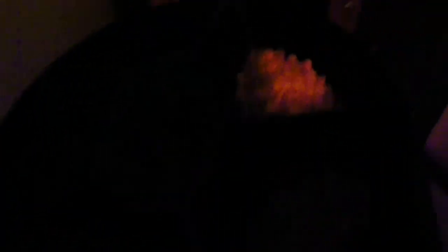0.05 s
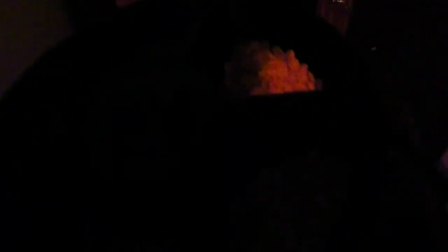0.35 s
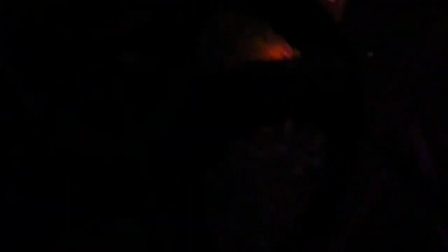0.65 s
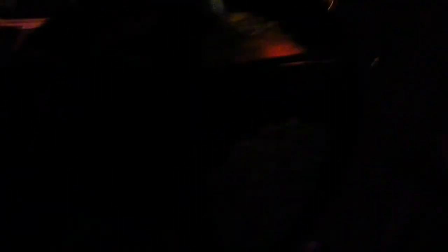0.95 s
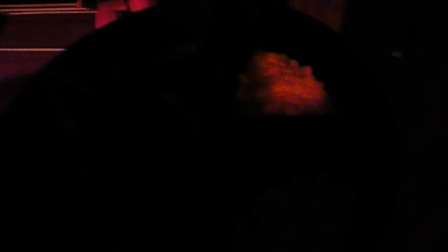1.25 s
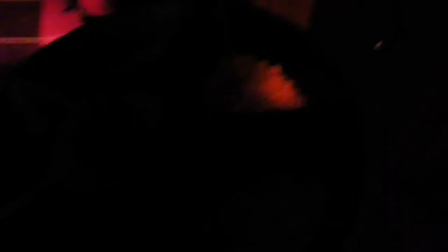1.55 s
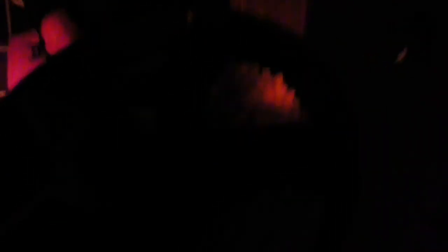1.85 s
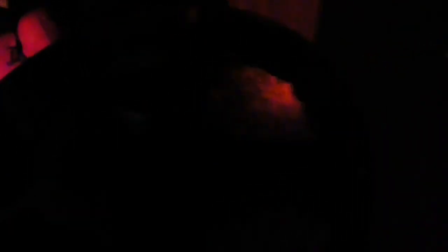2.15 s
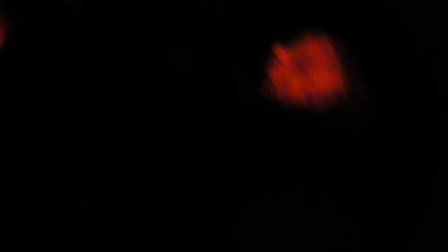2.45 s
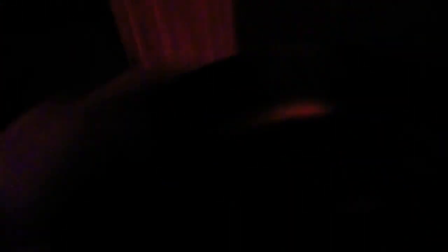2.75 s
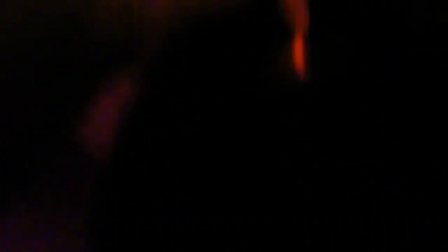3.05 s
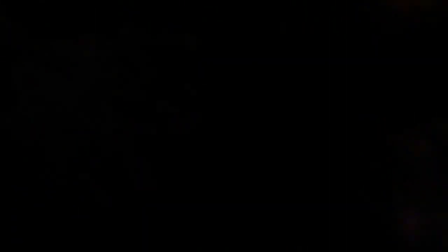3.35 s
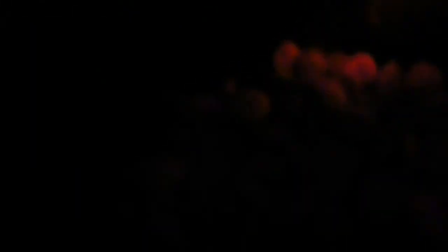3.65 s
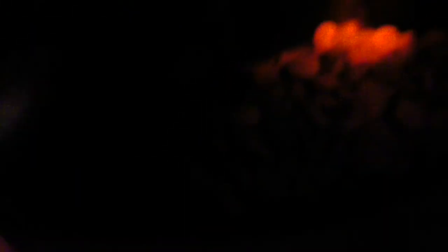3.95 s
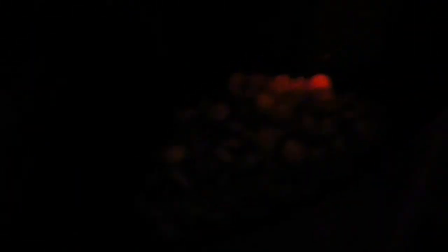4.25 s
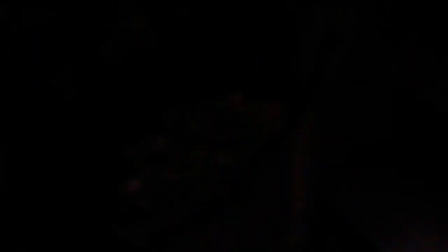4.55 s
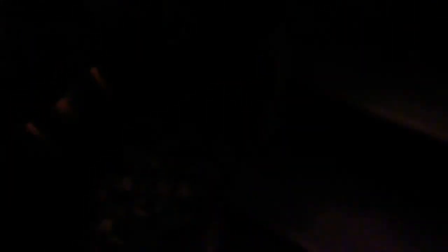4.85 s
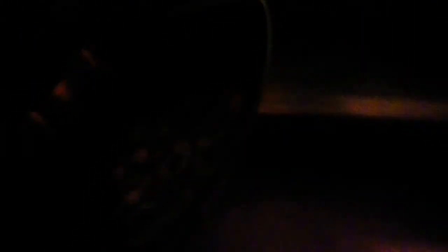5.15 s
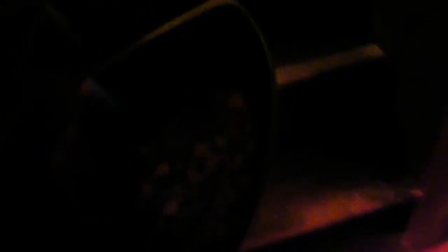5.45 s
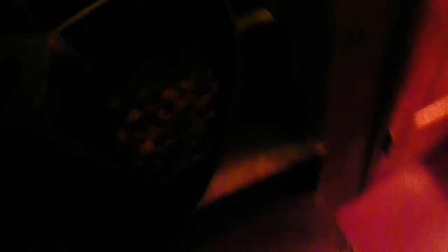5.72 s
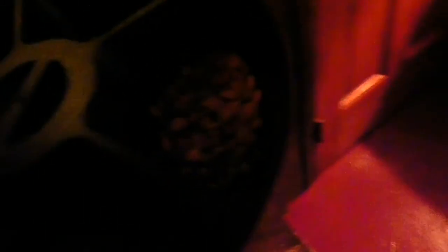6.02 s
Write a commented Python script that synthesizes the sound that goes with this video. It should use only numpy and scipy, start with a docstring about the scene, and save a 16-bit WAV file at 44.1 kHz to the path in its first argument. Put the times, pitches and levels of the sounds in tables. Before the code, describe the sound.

Irregular plastic clatter and sliding kibble over soft footsteps indoors, followed by a thud, a snapping catch and light rubbing.

```python
"""A hard plastic feeder tray of dry pet food is carried close to a small mono microphone, indoors.
At each step the floor booms softly, the lid knocks and kibble slides, drumming on the bowls.
The tray bumps something heavy and flexes; a catch squeaks along its seat, clacks and snaps shut.
Hands and sleeves rub the plastic in fine stick-slip grains, and a few single pellets tick.
A small hard room answers, and the loudest blows duck the gain."""
import sys
import numpy as np
from scipy import signal
from scipy.fft import rfft, irfft, next_fast_len
from scipy.io import wavfile
from scipy.ndimage import uniform_filter1d

SR = 44100
rng = np.random.default_rng(int(sys.argv[2]) if len(sys.argv) > 2 else 0)


def bounce(signal):
    """Save signal as a 16-bit WAV file at the path given by the first command-line argument."""
    frames = np.transpose(np.atleast_2d(signal))
    limited = np.clip(frames, -1, 1)
    pcm = np.round(limited * 32767).astype(np.int16)
    wavfile.write(sys.argv[1], SR, pcm)


N = 268250

# resonances of the tray: f/Hz, width/Hz, level/dB
TRAY_MODES = [(340, 19, 7), (480, 290, 1.5), (647, 300, -2), (866, 130, -2), (1304, 290, -4.5),
              (1634, 120, -8), (2330, 47, -6), (4100, 230, -7), (5380, 180, -10), (6340, 160, -8)]
# broad colour of struck plastic: f/Hz, level/dB
PLASTIC_COLOUR = [(30, -45), (60, -32), (100, -14), (200, -11), (300, -9), (600, -3.5), (1500, 0.5),
                  (3000, -0.5), (7000, 4), (10000, -3), (15000, -14)]
# strokes on the rim, mostly of sleeves (the one at 3.395 s is a hand): peak t/s, length/s, body level/dB,
# treble level/dB, fizz level/dB
SLEEVE_STROKES = [(2.5, .14, -63, -54, -47), (3.395, 0.033, -48, -36, -33), (4.127, 0.033, -81, -53, -49),
                  (4.219, 0.044, -52.5, -48.5, -62), (4.347, 0.057, -50.5, -51, -59),
                  (4.452, .07, -62, -49.5, -47), (4.565, 0.039, -58, -49.5, -51),
                  (4.669, 0.05, -54.5, -42, -35), (4.82, 0.21, -47.5, -52.5, -63),
                  (4.98, 0.032, -40, -36.5, -50), (5.112, 0.067, -46.5, -37.5, -58),
                  (5.198, 0.011, -42.5, -36.5, -36), (5.297, 0.034, -48, -36.5, -37),
                  (5.352, 0.033, -69, -54, -33.5), (5.44, 0.24, -53, -46.5, -62),
                  (5.5, 0.036, -58, -36, -33.5), (5.672, 0.076, -46.5, -39, -44),
                  (5.838, 0.081, -52, -35, -49), (5.96, 0.066, -53, -44.5, -58),
                  (6.07, 0.069, -60, -50, -62)]


def amp(db):
    """Decibels to gain."""
    return 10 ** (np.asarray(db) / 20)


def unit_rms(x):
    """Scales each row to rms 1."""
    return x / np.sqrt(np.mean(x ** 2, -1, keepdims=True) + 1e-20)


def curve(points, hz):
    """Reads a table over log frequency."""
    f, value = np.transpose(points)
    return np.interp(np.log(hz + 1), np.log(f), value)


def add(mix, s, sound):
    """Adds a sound to the mix at time s."""
    part = mix[max(round(s * SR), 0):][:len(sound)]
    part += sound[:len(part)]


def with_send(x, room_db):
    """Two rows: the direct sound and its send to the room."""
    return np.array([x, amp(room_db) * x])


def low_cut(x, hz):
    """Takes the deep bass out of a sound with a gentle high-pass."""
    return signal.sosfilt(signal.butter(2, hz, "highpass", fs=SR, output="sos"), x)


def resonance(modes, hz, bed_db):
    """Gain of a body: its resonances over a bed of dense weak modes."""
    peaks = sum(amp(db) ** 2 / (1 + (2 * (hz - f) / width) ** 2) for f, width, db in modes)
    return np.sqrt(amp(bed_db) ** 2 + peaks)


def contact(hz, treble_db):
    """A soft, long contact reaches only the low modes."""
    cutoff_hz = 1300 + 20000 * amp(1.53 * treble_db)
    return 1 / np.hypot(1, (hz / cutoff_hz) ** 2)


def bands(x, colour, bass_hz=210, treble_hz=2500):
    """Colours x by the gain colour(hz) and splits it into body, bass and treble."""
    size = next_fast_len(len(x), real=True)
    hz = np.fft.rfftfreq(size, 1 / SR)
    bass = 1 / (1 + (hz / bass_hz) ** 8)
    treble = 1 - 1 / (1 + (hz / treble_hz) ** 8)
    shares = np.sqrt(np.clip([1 - bass - treble, bass, treble], 0, 1))
    return irfft(rfft(x, size) * colour(hz) * shares, size)[:, :len(x)]


def grains(count, per_s, spread_db):
    """Tiny impacts of uneven strength at random moments."""
    chance, size, sign = rng.random(count), rng.exponential(1, count), rng.choice([-1, 1], count)
    return unit_rms((chance < per_s / SR) * sign * amp(spread_db * np.minimum(size, 4)))


def blows(hits, spectrum, modes, bed_db, ring_db, ring_share, hard_rise_s, bass_db, bass_t60, level_db):
    """Each blow sets a crowd of modes dying away; the spot that is hit favours one ring."""
    out, t = np.zeros(N), np.arange(8192) / SR
    hard_db, softening = -18, 0.42  # weaker, duller blows are softer contacts and rise more slowly
    for s, db, treble_db, decay, ring_hz in hits:
        def colour(hz):
            spot = 1 + amp(ring_db) / (1 + (2 * (hz - ring_hz) / (ring_share * ring_hz)) ** 2)
            return amp(curve(spectrum, hz)) * resonance(modes, hz, bed_db) * spot * contact(hz, treble_db)
        rise = hard_rise_s * amp(softening * (hard_db - db - max(treble_db, 0)))
        t60s = np.array([[1.66 * decay], [bass_t60], [1.12 * decay]])  # treble dies before the body
        envelope = np.minimum(t / rise, 1) * amp(-60 * np.maximum(t - rise, 0) / t60s)
        envelope_rms = np.sqrt(np.mean(envelope ** 2, 1, keepdims=True))
        noise = bands(rng.standard_normal(len(t)), colour)
        body, bass, treble = unit_rms(noise * envelope) * envelope_rms
        clack = low_cut(body + amp(treble_db) * treble, hz=203)
        add(out, s, amp(level_db + db) * (clack + amp(bass_db) * bass))
    return out


def strokes(peaks, lengths, dbs, lean=0.15, roundness=1.69):
    """Gain of a run of strokes: each swells faster than it fades, 3 dB down at the ends of its length."""
    t = np.arange(0, N, 64) / SR
    since = t - peaks[:, None]
    away = abs(2 * since / lengths[:, None] / (1 + lean * np.sign(since)))
    power = amp(dbs[:, None]) ** 2 * 0.5 ** (away ** roundness)
    return np.interp(np.arange(N) / SR, t, np.sqrt(power.sum(0)))


def rubbing(rows, modes, per_s, spread_db, bass_db):
    """Fine stick-slip grains of skin or cloth on plastic."""
    # broad colour of the friction: f/Hz, level/dB
    spectrum = [(30, -6.5), (100, 9), (200, -4.5), (330, -1), (450, 0.5), (900, 1), (1500, 0.5), (2300, 0),
                (4000, 6), (6300, 10), (9000, 6), (12000, -4), (15500, -9.5)]
    s, length, body_db, treble_db, *_ = np.transpose(rows)
    friction = grains(N, per_s, spread_db)
    coloured = bands(friction, lambda hz: amp(curve(spectrum, hz)) * resonance(modes, hz, bed_db=-2))
    body, bass, treble = unit_rms(coloured)
    rub = (body + amp(bass_db) * bass) * strokes(s, length, body_db)
    return rub + treble * strokes(s, length, treble_db)


def air(level_db):
    """Steady faint hiss of the room and microphone."""
    # colour of the hiss: f/Hz, level/dB
    spectrum = [(18, -34), (30, -15), (225, -19), (341, -4), (399, -11.5), (518, -4.5), (808, -16),
                (5040, -18), (6370, -14.5), (8060, -18), (10200, -19.5), (15500, -25.5)]
    colour = amp(curve(spectrum, np.fft.rfftfreq(N, 1 / SR)))
    return amp(level_db) * unit_rms(irfft(rfft(rng.standard_normal(N)) * colour, N))


def lid_knocks():
    """Lid and kibble knock against the tray and ring its modes."""
    # knocks: t/s, body level/dB, treble over body/dB, base decay/s, ring f/Hz
    hits = [(0.032, -34, -20, 0.011, 860), (0.116, -30, -3, 0.11, 675), (0.271, -55.5, 20, .12, 2460),
            (0.2875, -17, 1.5, 0.037, 990), (0.2925, -15, -0.5, 0.048, 1600), (0.308, -26, 0, 0.12, 900),
            (0.386, -30.5, -1.5, 0.1, 1740), (0.441, -32.5, 3, .09, 2470), (0.48, -36.5, 12, .11, 3130),
            (0.541, -32.5, 10, 0.065, 6940), (0.551, -39, 9, 0.033, 3800), (0.5775, -19.5, 10, 0.045, 3880),
            (0.593, -18, -1.5, 0.062, 1630), (0.627, -27.5, 8.5, 0.11, 5800),
            (0.765, -33.5, 4.5, 0.086, 2220), (0.869, -37.5, -16, 0.13, 1220),
            (0.8905, -27.5, 1, 0.085, 6300), (0.991, -25, 0, 0.066, 2380), (1.077, -30, -5, 0.064, 816),
            (1.171, -33.5, -39, 0.11, 860), (1.203, -33, -3.5, 0.071, 680), (1.278, -33, 0, 0.22, 3760),
            (1.366, -34, 3, 0.28, 1660), (1.416, -31, -13, 0.13, 1540), (1.4425, -16, -5.5, 0.052, 1480),
            (1.456, -25, -1, 0.072, 1320), (1.772, -29, -3.5, 0.072, 715), (1.808, -27.5, -12, 0.21, 680),
            (1.859, -34, 5.5, 0.22, 1470), (2.156, -35.5, -1, 0.17, 567), (2.192, -31.5, -2.5, 0.23, 1020),
            (2.216, -24.5, -7, 0.049, 1290), (2.586, -33, -6.5, 0.075, 1280), (2.966, -42, 11, 0.21, 2820),
            (3.005, -32.5, -7.5, .1, 650), (3.26, -25.5, -8.5, 0.06, 1296), (4.409, -41, 2.5, 0.047, 6100),
            (4.536, -45, -19, 0.065, 1020), (5.257, -39, -22, 0.019, 1190)]
    return blows(hits, PLASTIC_COLOUR, TRAY_MODES, bed_db=-8, ring_db=7.5, ring_share=0.085,
                 hard_rise_s=0.0021, bass_db=-35, bass_t60=0.22, level_db=-1.5)


def hands(level_db):
    """Skin rubs the tray as the hands shift their grip."""
    # strokes: peak t/s, length/s, body level/dB, treble level/dB
    grips = [(0.05, 0.13, -47, -34), (0.23, 0.66, -36.5, -51), (0.7, .1, -60, -41), (1.1, 0.36, -42, -42.5),
             (1.52, 0.037, -57, -43), (1.68, 0.15, -44.5, -42.5), (2.02, 0.48, -43, -46.5),
             (2.5, 0.33, -51.5, -45), (2.64, 0.029, -32.5, -34), (2.735, 0.088, -25.5, -31),
             (2.875, 0.066, -20, -39.5), (3.2, 0.1, -47, -42), (3.32, 0.081, -36, -36.5),
             (3.49, 0.21, -42, -39.5), (3.8, 0.36, -45, -52)]
    return amp(level_db) * rubbing(grips, TRAY_MODES, per_s=7000, spread_db=2, bass_db=-28.5)


def footfalls(rise_s=0.022, boom_t60=0.91, ring_t60=0.82):
    """Each step shakes floor and tray: a soft low boom with one pitched ring."""
    # steps: t/s, level/dB, ring f/Hz
    steps = [(0.439, -41.5, 126.2), (0.889, -45, 86.7), (1.272, -45, 105.7), (1.779, -47, 81.8),
             (2.16, -44, 87.7), (2.66, -40, 122.7)]
    # resonances of the boom: f/Hz, width/Hz, level/dB
    modes = [(80, 24, -3.5), (126, 42, 3)]
    out, t = np.zeros(N), np.arange(SR // 2) / SR
    for s, db, ring_hz in steps:
        noise = rng.standard_normal(len(t))
        _, bass, _ = bands(noise, lambda hz: resonance(modes, hz, bed_db=-32) * hz / (hz + 60))
        boom = unit_rms(bass) * amp(-1.5 - 60 * t / boom_t60)
        ring = unit_rms(np.sin(2 * np.pi * ring_hz * t)) * amp(-0.5 - 60 * t / ring_t60)
        add(out, s, np.minimum(t / rise_s, 1) * amp(db) * (boom + ring))
    return out


def pellet_pings(count, per_s=380, spread_db=6, low_hz=1019, high_hz=6960, t60=0.04, pellets=300):
    """Sliding pellets ring briefly, each at its own pitch."""
    out, t = np.zeros(count), np.arange(1500) / SR
    for place, pitch, force, chance in rng.random((pellets, 4)):
        if chance < per_s * count / SR / pellets:
            hz = low_hz * (high_hz / low_hz) ** pitch
            ping = amp(spread_db * force - 60 * t / t60) * np.sin(2 * np.pi * hz * t)
            add(out, place * count / SR, ping)
    return unit_rms(out)


def kibble_slides(level_db, bass_db=-27.5):
    """Pellets tumble over each other and drum on the plastic bowl, gathering speed, then settling."""
    # slides: start t/s, fastest t/s, level/dB, swell/dB, treble over body/dB, settling t60/s
    slides = [(0.46, 0.61, -28.5, 17.5, 3.5, 0.28), (0.9, 0.99, -29, 5.5, 5, .3),
              (1.28, 1.44, -31.5, 16.5, 5, .4), (1.78, 1.885, -24.5, 9.5, -1.5, .22),
              (2.217, 2.295, -24, 1, 2, 0.23), (2.777, 2.81, -22, -4, -8.5, 0.64),
              (3.361, 3.408, -32.5, 15, 6.5, 0.15), (5.8, 5.9, -57.5, 5, 27.5, .55)]
    # broad colour of kibble: f/Hz, level/dB
    spectrum = [(30, -36), (60, -45), (90, 3), (140, 1), (220, -6.5), (350, 1), (650, 8.5), (1500, -3.5),
                (3000, -6.5), (7000, -4), (10000, -11), (15000, -27)]
    out = np.zeros(N)
    for start, fastest, top_db, swell_db, treble_db, t60 in slides:
        def colour(hz):
            bowl = resonance(TRAY_MODES, hz, bed_db=-4.5)
            return amp(curve(spectrum, hz)) * bowl * contact(hz, treble_db + 2)
        t = np.arange(start, fastest + t60 / 2, 1 / SR)
        db = top_db + np.interp(t, [start, fastest, fastest + t60], [-swell_db, 0, -60])
        tumble = grains(len(t), per_s=2600, spread_db=-0.5) + amp(-3) * pellet_pings(len(t))
        layers = unit_rms(bands(tumble, colour)) * amp([db, db + bass_db, db + treble_db])
        add(out, start, amp(level_db) * layers.sum(0) * signal.windows.tukey(len(t), 0.03))
    return out


def pellet_ticks(level_db):
    """Single pellets tick close by: short dry cracks with one broad ring."""
    # ticks: t/s, level/dB, ring f/Hz, t60/s
    ticks = [(2.041, -31, 5630, 0.017), (2.041, -36.5, 12100, 0.015), (3.836, -35, 5770, 0.055),
             (4.942, -31.5, 2290, 0.016), (4.9678, -26.5, 6300, 0.0084), (5.193, -35, 4000, 0.036),
             (5.235, -39, 5130, .014), (5.745, -35.5, 4270, 0.031), (5.8907, -24, 3260, 0.042),
             (5.8989, -18, 2520, 0.023), (5.947, -28.5, 9000, .015)]
    out, t = np.zeros(N), np.arange(2048) / SR
    hz = np.fft.rfftfreq(len(t), 1 / SR)
    plastic = amp(curve(PLASTIC_COLOUR, hz)) * hz / (hz + 1500)
    for s, db, ring_hz, t60 in ticks:
        ring = resonance([(ring_hz, 0.25 * ring_hz, 0)], hz, bed_db=-17)
        crack = unit_rms(irfft(rfft(rng.standard_normal(len(t))) * ring * plastic))
        add(out, s, amp(level_db + db - 60 * t / t60) * crack)
    return low_cut(out, hz=940)


def sleeves(level_db):
    """Cloth brushes the rim and stirs the tray's resonances."""
    # resonances of the rubbed tray: f/Hz, width/Hz, level/dB
    modes = [(340, 50, 6), (1630, 70, 6), (2224, 220, 5.5), (3120, 190, -9), (6800, 620, -4)]
    return amp(level_db) * rubbing(SLEEVE_STROKES, modes, per_s=14000, spread_db=4, bass_db=-35)


def thread_fizz(level_db, band_hz=(8200, 13500)):
    """Threads of cloth flick over the rim during each stroke of a sleeve."""
    s, length, *_, db = np.transpose(SLEEVE_STROKES)
    bandpass = signal.butter(2, band_hz, "bandpass", fs=SR, output="sos")
    threads = signal.sosfilt(bandpass, grains(N, per_s=18000, spread_db=4))
    return amp(level_db) * strokes(s, length, db) * unit_rms(threads)


def tray_flexes():
    """The jolted tray rings in its low bending modes; as the catch rubs its seat, it rings at one low pitch."""
    # low rings: t/s, peak level/dB, f/Hz, rise/s, t60/s
    flexes = [(2.671, -17.5, 360.6, .022, 0.23), (2.674, -30, 92, .01, 0.19),
              (2.791, -9, 518, .0014, 0.022), (2.792, -22, 61.7, .0022, 0.032),
              (3.372, -28.5, 618, .02, 0.15)]
    out, t = np.zeros(N), np.arange(SR // 2) / SR
    for s, db, hz, rise, t60 in flexes:
        envelope = np.minimum(t / rise, 1) * amp(db - 60 * np.maximum(t - rise, 0) / t60)
        add(out, s, envelope * np.sin(2 * np.pi * hz * t))
    return out


def tray_bumps():
    """The whole tray thuds against something heavy."""
    # bumps: t/s, body level/dB, treble over body/dB, base decay/s, ring f/Hz
    hits = [(2.676, -22.5, -9, 0.062, 341), (2.688, -20.5, -35, .031, 332), (2.7905, -11, -9, 0.021, 542)]
    # dark colour of the thud: f/Hz, level/dB
    spectrum = [(30, -21), (60, -11), (130, 14), (240, 4), (400, 4.5), (700, -1), (1400, -5), (2500, -30.5),
                (7000, -20), (10000, -30), (15000, -30)]
    return blows(hits, spectrum, TRAY_MODES, bed_db=-3, ring_db=8.5, ring_share=0.039,
                 hard_rise_s=0.001, bass_db=-16, bass_t60=0.082, level_db=2.5)


def catch_squeaks(level_db, jitter=0.026):
    """The catch sticks and slips along its seat, plastic on plastic: an unsteady gliding tone."""
    # one glide a squeak: t/s, f/Hz, level/dB
    glides = [
        [(3.355, 752, -42), (3.383, 797, -24), (3.4, 807, -30), (3.43, 776, -50)],
        [(3.548, 830, -5), (3.556, 794, -13.5), (3.585, 823, -31), (3.598, 810, -22), (3.615, 898, -20.5),
         (3.635, 938, -37), (3.65, 1020, -33), (3.672, 930, -33), (3.69, 937, -25), (3.705, 950, -59)],
        [(3.693, 357, -76), (3.705, 445, -27), (3.718, 480, -28.5), (3.735, 473, -62)],
    ]
    # harmonics: multiple of the pitch, level/dB
    partials = [(1, 0.5), (2, -22), (3, -35), (4, -19)]
    out = np.zeros(N)
    for glide in glides:
        s, hz, db = np.transpose(glide)
        t = np.arange(s[0], s[-1], 1 / SR)
        waver = 1 + jitter * unit_rms(uniform_filter1d(rng.standard_normal(len(t)), size=120))
        grip_db = 3 * unit_rms(uniform_filter1d(rng.standard_normal(len(t)), size=260))
        phase = 2 * np.pi * np.cumsum(np.interp(t, s, hz) * waver) / SR
        tone = sum(amp(partial_db) * np.sin(k * phase) for k, partial_db in partials)
        envelope = amp(level_db + np.interp(t, s, db) + grip_db) * signal.windows.tukey(len(t), 0.03)
        add(out, s[0], envelope * tone)
    return out


def catch_clacks():
    """The catch touches its seat, clacks and bounces."""
    # contacts: t/s, body level/dB, treble over body/dB, base decay/s, ring f/Hz
    hits = [(3.376, -32, -24, 0.17, 684), (3.548, -13, 2, 0.05, 2070), (3.556, -18.5, 1, 0.15, 1050),
            (3.577, -16, 0, 0.083, 1760), (3.598, -23, 2.5, 0.18, 1730), (3.692, -24, -2.5, 0.035, 1620)]
    # resonances of the catch: f/Hz, width/Hz, level/dB
    modes = [(430, 41, 1.5), (807, 37, -1), (1064, 26, -1.5), (1350, 50, -0.5), (1760, 63, -5),
             (1960, 86, -4), (3290, 360, -5.5), (3900, 120, -7.5), (4540, 86, -5), (5570, 220, -6),
             (6500, 90, -7), (8900, 440, -9)]
    return blows(hits, PLASTIC_COLOUR, modes, bed_db=-14.5, ring_db=12, ring_share=0.098,
                 hard_rise_s=0.0007, bass_db=-18, bass_t60=0.092, level_db=-2.5)


def catch_snap():
    """The catch snaps shut in one short, bright blow."""
    # snap: t/s, body level/dB, treble over body/dB, base decay/s, ring f/Hz
    hits = [(3.8558, -15.5, 6.5, 0.027, 1210)]
    # resonances of the closing catch: f/Hz, width/Hz, level/dB
    modes = [(615, 440, -12), (1100, 350, -3), (1770, 90, -2.5), (3485, 100, 4.5), (4220, 380, 1.5),
             (4930, 330, -6), (6020, 240, -3), (9250, 1600, -4)]
    return blows(hits, PLASTIC_COLOUR, modes, bed_db=-17, ring_db=5, ring_share=0.12,
                 hard_rise_s=0.00085, bass_db=-56, bass_t60=0.046, level_db=1.5)


def room(x, build_s=0.0037, tails=3):
    """A small hard room; its echoes crossfade as the tray moves through it."""
    # reverb time: f/Hz, t60/s
    decay = [(50, 0.3), (90, 1), (200, 0.55), (530, 0.24), (1400, 0.34), (3700, 0.33), (7000, 0.33),
             (14000, 0.12)]
    out, travel = np.zeros(N), np.pi * np.arange(N) / SR
    for k in range(tails):
        hz, t, noise = signal.stft(rng.standard_normal(SR // 2), SR, nperseg=256)
        _, tail = signal.istft(noise * amp(-60 * t / curve(decay, hz)[:, None]), SR, nperseg=256)
        tail *= np.minimum(np.arange(len(tail)) / SR / build_s, 1)
        crossfade = np.sqrt(2 / tails) * np.cos(travel + np.pi * k / tails)
        out += signal.oaconvolve(x * crossfade, tail / np.linalg.norm(tail))[:N]
    return out


def scene():
    """All sources meet at one microphone; footfalls, rubbing and hiss stay dry."""
    direct, send = (
        with_send(lid_knocks(), room_db=-11)
        + with_send(tray_bumps(), room_db=-8)
        + with_send(catch_clacks(), room_db=-17.5)
        + with_send(catch_snap(), room_db=-10.5)
        + with_send(kibble_slides(level_db=-5), room_db=-10)
        + with_send(pellet_ticks(level_db=0.5), room_db=-7.5)
        + with_send(tray_flexes(), room_db=-14)
        + with_send(catch_squeaks(level_db=-5), room_db=-22))
    handling = hands(level_db=-8) + sleeves(level_db=-1)
    mono = direct + room(send) + footfalls() + handling + thread_fizz(level_db=-9.5) + air(level_db=-54)
    return np.array([mono, mono])


def port_dip(x, hz, width_hz, depth):
    """A dip in the response of the microphone port."""
    notched = signal.lfilter(*signal.iirnotch(hz, hz / width_hz, fs=SR), x)
    return x + depth * (notched - x)


def gain_control(x, threshold_db=-23.5, slope=0.21, attack_s=0.023, recovery_db_per_s=13):
    """Loud blows turn the gain down; it recovers slowly."""
    power_db = 10 * np.log10(abs(uniform_filter1d(x[0] ** 2, size=400)) + 1e-12)
    fall_db = np.arange(N) * recovery_db_per_s / SR
    held_db = np.maximum.accumulate(power_db + fall_db) - fall_db
    over_db = np.maximum(held_db - threshold_db, 0)
    pole = np.exp(-1 / (attack_s * SR))
    return x / amp(slope * signal.lfilter([1 - pole], [1, -pole], over_db))


def record(dry):
    """The microphone's two dips, gain control, then the band limit."""
    coloured = port_dip(dry, hz=7890, width_hz=770, depth=1)
    coloured = port_dip(coloured, hz=187.6, width_hz=107, depth=0.87)
    lowpass = signal.firwin(255, cutoff=16050, window=("kaiser", 8), fs=SR)
    return signal.oaconvolve(gain_control(coloured), lowpass[None], "same")


dry = scene()
out = record(dry)
bounce(out)
```